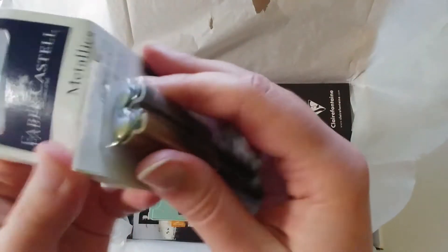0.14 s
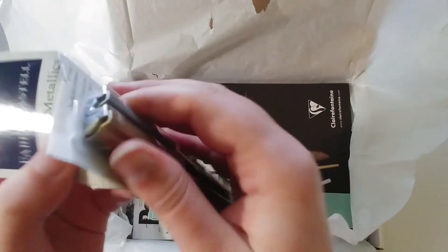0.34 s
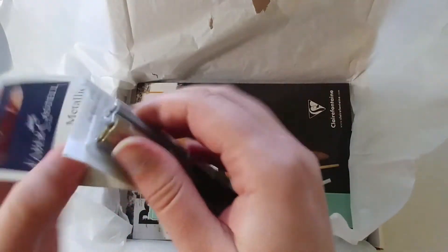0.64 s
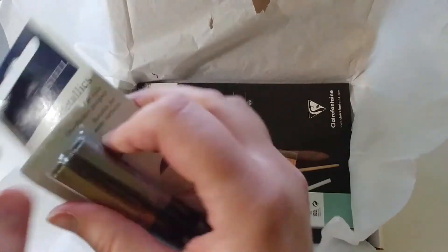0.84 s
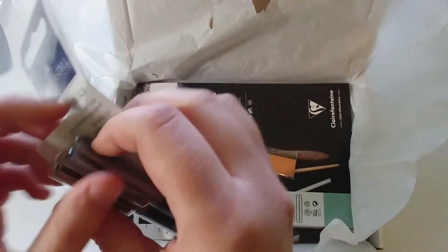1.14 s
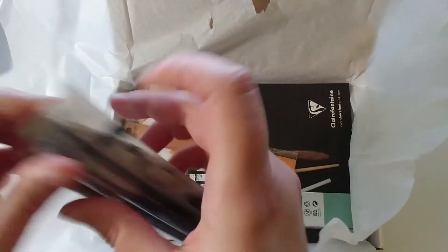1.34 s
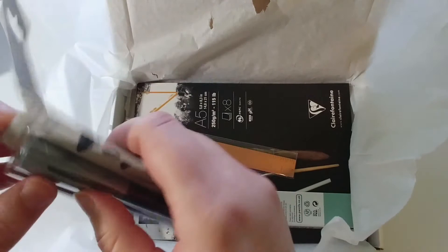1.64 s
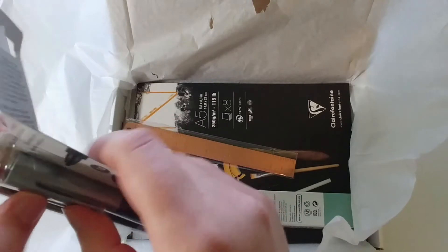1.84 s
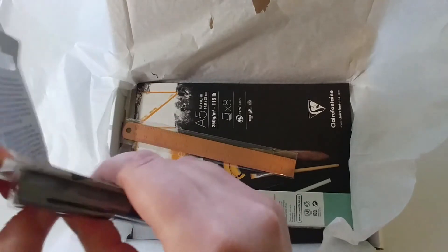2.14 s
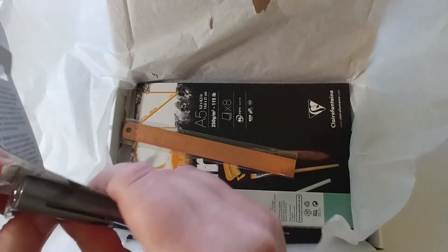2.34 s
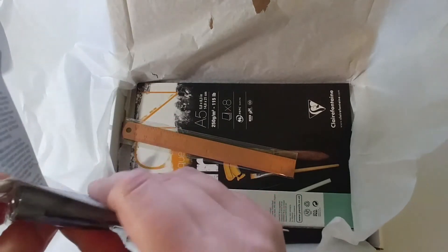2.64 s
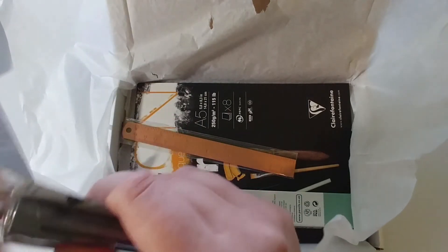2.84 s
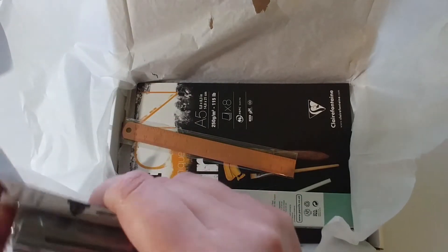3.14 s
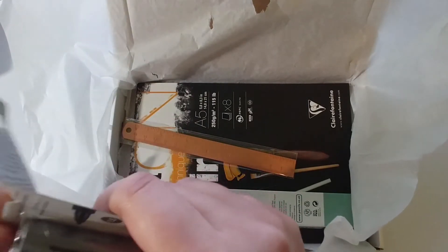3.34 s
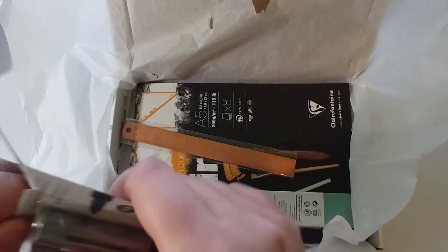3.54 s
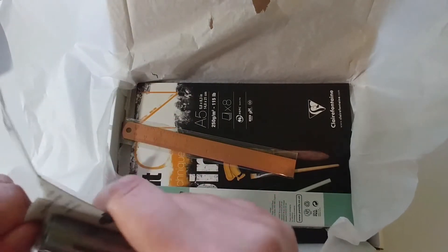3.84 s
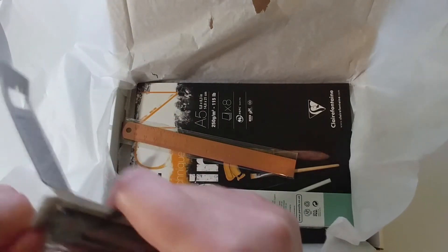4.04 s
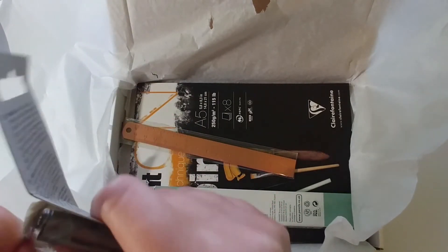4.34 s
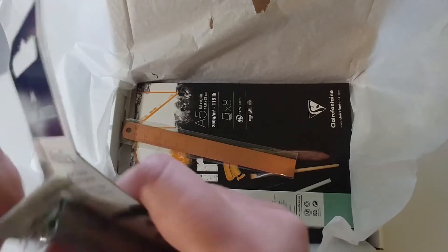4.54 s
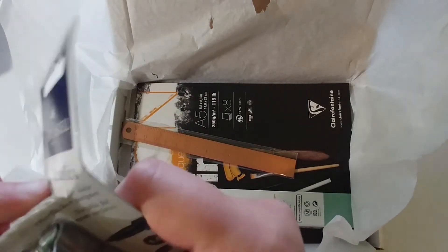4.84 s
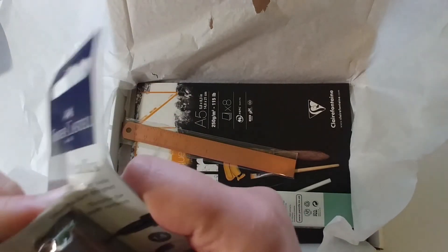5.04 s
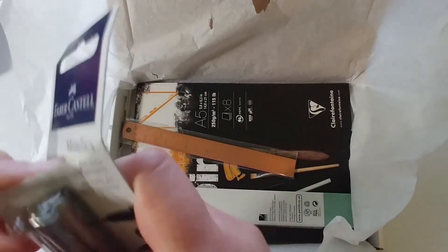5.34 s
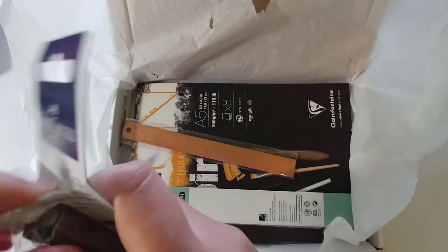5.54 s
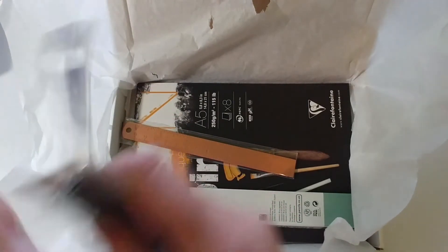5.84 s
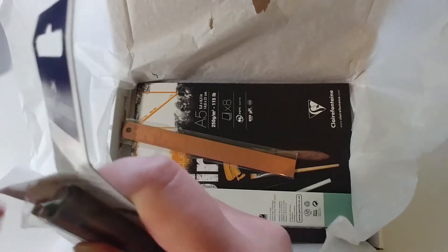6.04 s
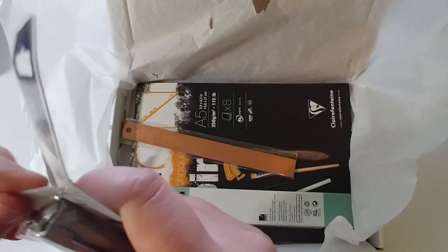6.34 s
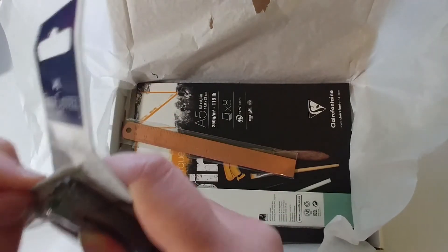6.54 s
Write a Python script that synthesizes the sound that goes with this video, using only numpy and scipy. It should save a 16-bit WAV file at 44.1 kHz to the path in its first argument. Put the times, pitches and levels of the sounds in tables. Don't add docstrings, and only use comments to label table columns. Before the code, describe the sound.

Very close to a small stereo microphone, hands bend a stiff plastic blister pack. Film rustles and crackles, then hard bright snaps burst irregularly, with a soft card crease and a dull table knock before one second. Snaps cluster from two seconds and return in loud groups around four, five and nearly six seconds. A small room answers briefly; faint hum lies beneath.

```python
import sys
import numpy as np
from scipy import signal
from scipy.fft import rfft, irfft
from scipy.io import wavfile
from scipy.ndimage import uniform_filter1d, minimum_filter1d

SR = 44100
rng = np.random.default_rng(int(sys.argv[2]) if len(sys.argv) > 2 else 0)


def pcm_store(signal):
    levels = np.round(np.clip(np.atleast_2d(signal), -1, 1) * 32767)
    wavfile.write(sys.argv[1], SR, levels.astype(np.int16).T)


def voltage_ratio(level):
    return 10 ** (np.asarray(level, float) / 20)


N = 294493


def evened(x):
    return x / np.sqrt(np.mean(x ** 2) + 1e-20)


def read(points, hz):
    f, value = np.transpose(points)
    return np.interp(np.log(hz + 1), np.log(f + 1), value)


def causal(points, size=2048):
    log_gain = np.log(voltage_ratio(read(points, abs(np.fft.fftfreq(size, 1 / SR)))))
    return np.fft.ifft(np.exp(np.conj(signal.hilbert(log_gain)))).real[:size // 2]


def add(mix, s, sound):
    part = mix[:, round(s * SR):][:, :sound.shape[1]]
    part += sound[:, :part.shape[1]]


def ports(left, right, pan_db):
    lag = 13
    return np.array([left * voltage_ratio(pan_db / 2), np.roll(right * voltage_ratio(-pan_db / 2), lag)])


# (frequency [Hz], level [dB per Hz])
HUM_COLOUR = [(25, -37.5), (45, 2), (68, 15.5), (95, -1.5), (180, -5), (540, -4), (1200, -10.5),
              (3000, -10), (6800, -17), (7800, -5.5), (10400, -36), (12000, -19), (15300, -17),
              (16300, -45.5)]
# (time [s], level [dB])
MOTOR_LEVEL = [
    (0, -82),
    (1.7, -80),
    (1.9, -70),
    (2.2, -80),
    (4.5, -80),
    (4.75, -68),
    (5.8, -69),
    (6.0, -82),
    (6.68, -82),
]


def air():
    noise = rng.standard_normal((2, N)) + .5 * rng.standard_normal(N)
    shaped = irfft(rfft(noise) * voltage_ratio(read(HUM_COLOUR, np.fft.rfftfreq(N, 1 / SR))), N)
    drone = evened(signal.lfilter(*signal.iirpeak(133, 14.0, SR), noise))
    drone_db = np.interp(np.arange(N) / SR, *np.transpose(MOTOR_LEVEL))
    both = voltage_ratio(-62.5) * evened(shaped) + voltage_ratio(drone_db + 2.5) * drone
    return both * voltage_ratio(np.array([[1.5], [-1.5]]))


# (time of peak [s], level [dB])
STROKES = [(0.0, -40), (0.2, -34.5), (0.42, -42), (0.76, -29.5), (1.07, -54), (1.14, -49.5), (1.25, -39.5),
           (1.43, -36.5), (2.43, -39.5), (2.56, -34), (2.92, -37), (3.42, -30), (3.66, -37.5), (4.2, -29.5),
           (4.63, -32.5), (5.06, -36.5), (5.58, -45), (5.95, -22.5)]


def effort():
    swell_db_per_s, fade_db_per_s = 221, 257
    peak_s, peak_db = np.transpose(STROKES)
    late = np.arange(0, N + 64, 64)[:, None] / SR - peak_s
    db = peak_db - np.where(late < 0, -swell_db_per_s, fade_db_per_s) * late
    return np.repeat(db.max(axis=1), 64)[:N]


def crackle(size, per_s=5000, spread_db=3.0):
    ticks = voltage_ratio(spread_db * np.minimum(rng.exponential(1, size), 4)) * (rng.random(size) < per_s / SR)
    return ticks * (0.46 * rng.standard_normal(size) + rng.standard_normal((2, size)))


# (frequency [Hz], level [dB])
FILM_COLOUR = [(150, -41.5), (500, -11), (1200, -9.5), (2500, -1.5), (4500, 1), (7000, -2.5), (12000, -18),
               (17000, -9.5)]


def rustle():
    colour = causal(FILM_COLOUR)[None]
    left, right = evened(signal.oaconvolve(crackle(N), colour, axes=1)[:, :N])
    return voltage_ratio(effort() - 17.0) * np.vstack([ports(left, right, 23.4), left])


# (frequency [Hz], time to fall by 60 dB [s])
ROOM_RING = [(250, 0.24), (700, 0.16), (1800, 0.19), (4500, 0.17), (8000, 0.15), (12000, 0.14)]
# (time [s], level [dB])
ECHOES = [(.0025, -26.5), (.0045, -13), (.012, -15.5), (.018, -34)]


def room(x, push):
    out, turn = np.zeros((2, N)), np.arange(N) / SR * 9
    for k in range(3):
        taps = np.zeros((2, SR // 2))
        at = np.arange(40, SR // 2 - 10, 10) + rng.integers(0, 10, (2, (SR // 2 - 41) // 10))
        np.put_along_axis(taps, at, rng.choice([-1., 1.], at.shape), 1)
        hz, t, z = signal.stft(taps, SR, nperseg=128)
        tail = signal.istft(z * voltage_ratio(-60 * t / read(ROOM_RING, hz)[:, None]), SR, nperseg=128)[1]
        tail *= 1 - np.exp(-(np.arange(tail.shape[1]) / SR / .014) ** 2)
        share = np.sqrt(2 / 3) * np.cos(turn + k * np.pi / 3)
        out += signal.fftconvolve(push[None] * share, tail / np.linalg.norm(tail[0]), axes=1)[:, :N]
    out = signal.lfilter(*signal.butter(1, 350, "high", fs=SR), out)
    early = np.zeros((2, N))
    for k, (s, db) in enumerate(ECHOES):
        sides = x[::(-1) ** k]
        early += voltage_ratio(db) * np.roll(sides, round(s * SR), 1)
    return voltage_ratio(-8.5) * out + early


def body(push, hz, card_db, edge_db, ring_db=-42.0, broad_db=-2.0):
    panel = signal.lfilter(*signal.iirpeak(hz, 2.6, SR), push)
    ring = signal.lfilter(*signal.iirpeak(hz, 9.0, SR), push)
    broad = signal.lfilter(*signal.butter(2, [0.2 * hz, min(3.5 * hz, 9000)], "band", fs=SR), push)
    card = signal.lfilter(*signal.butter(1, [60, 900], "band", fs=SR), push)
    edge = signal.lfilter(*signal.butter(2, 6000, "high", fs=SR), push)
    parts = zip([panel, ring, broad, card, edge], [0, ring_db, broad_db, card_db, edge_db])
    return evened(sum(voltage_ratio(db) * evened(part) for part, db in parts))


# (time [s], left over right [dB])
HANDS = [
    (0, 2),
    (0.6, 7),
    (1.9, 5.5),
    (2.4, 2.5),
    (4.0, 3),
    (5.2, 1),
    (6.68, 12),
]


def balance(s, db):
    return np.interp(s, *np.transpose(HANDS)) - 0.4 * db


def flurry(length, db, hz, card_db, pan_db):
    ticks = crackle(SR // 4)[:, :round(length * SR)]
    swelling = ticks * signal.windows.tukey(ticks.shape[1], .7)
    edge_db = 13.0 * np.log2(hz / 5000)
    left, right = body(swelling, hz, card_db, edge_db)
    return voltage_ratio(db) * np.vstack([ports(left, right, pan_db), left])


def add_flurries(pack, rows, card_db):
    for s, length, db, hz in rows:
        add(pack, s, flurry(length, db, hz, card_db, balance(s, db + 27)))


# (time [s], length [s], level [dB], centre [Hz])
BENDS = [(.01, 0.052, -40.5, 3030), (0.643, 0.092, -43.5, 2450), (0.768, 0.012, -16, 900),
         (0.849, 0.072, -54, 2910), (1.172, 0.041, -39, 3150), (1.248, 0.33, -49.5, 1800),
         (1.3, 0.082, -61, 950), (1.592, 0.026, -46, 1190), (4.69, 0.031, -47, 700),
         (5.035, 0.031, -39, 3010), (5.201, 0.021, -51, 604), (0.6, 0.24, -58.5, 524)]


def bends(pack):
    add_flurries(pack, BENDS, card_db=8)


def snap(db, hz, card_db=-28.5, edge_db=-0.5, pan_db=0.0, broad_db=-2.0):
    t = np.arange(600) / SR
    same = 0.39
    jerks = rng.standard_normal((3, len(t))) * voltage_ratio(0.55 * rng.standard_normal(len(t)))
    jerks[1] = same * jerks[0] + np.sqrt(1 - same ** 2) * jerks[1]
    jerks *= voltage_ratio(-60 * t / .010) * (1 - np.exp(-t / .0004))
    jerks[2] = (t == 0) + .12 * jerks[2]
    left, right, push = (body(jerk, hz, card_db + 19.5, edge_db + 0.5, ring_db, broad_db)
                         for jerk, ring_db in zip(jerks, [-3.0, -3.0, -15.0]))
    return voltage_ratio(db - 18) * np.vstack([ports(left, right, np.clip(pan_db, -4, 14)), push])


def add_snaps(pack, rows, thump_db, broad_db):
    for s, db, hz, edge_db in rows:
        add(pack, s, snap(db, hz, thump_db - 0.1 * db, edge_db, balance(s, db), broad_db))


# (time [s], level [dB], ring [Hz], edge spray [dB])
WALLS = [(0.028, -23.5, 2690, -38), (1.531, -15, 2480, -3), (1.862, -27, 2560, -24),
         (2.18, -8.5, 3090, -25), (2.992, -27.5, 3130, 11), (3.366, -3, 3040, -5.5), (3.449, -7, 2860, 2),
         (3.609, -6, 2910, -6), (3.815, -39, 3060, -10), (4.055, 9, 3130, -3), (4.163, -1.5, 3250, -3),
         (4.575, -25, 2730, -15.5), (4.827, -29, 2660, -1), (5.053, 2, 2990, -2), (5.3, -4, 2370, 4.5),
         (6.015, -3, 2830, -1.5), (6.026, -7.5, 2580, -3), (6.545, -13, 2850, -36)]


def walls(pack):
    add_snaps(pack, WALLS, thump_db=-30.5, broad_db=1)


# (frequency [Hz], level [dB], time to fall by 60 dB [s])
TABLE_NOTES = [(73.4, -0.5, 0.082), (172, 1.5, 0.046), (304, -10, 0.017), (760, -7.5, 0.076)]


def knock(db):
    t = np.arange(6000) / SR
    boom = sum(voltage_ratio(level_db - 60 * t / t60) * np.sin(2 * np.pi * hz * t) for hz, level_db, t60 in TABLE_NOTES)
    return ports(boom, boom, 39.0) * voltage_ratio(db - 2.5) * (1 - np.exp(-t / 0.0024))


# (time [s], level [dB])
KNOCKS = [(0.037, -55), (0.738, -43), (0.777, -28), (1.432, -50), (5.059, -42), (0.181, -48.5),
          (2.189, -46.5), (3.368, -65), (4.02, -42.5), (5.29, -45), (5.869, -47)]


def knocks():
    table = np.zeros((2, N))
    for s, db in KNOCKS:
        add(table, s, knock(db))
    return table


# (time [s], length [s], level [dB], centre [Hz])
FLURRIES = [(0.051, 0.056, -44.5, 3330), (0.165, 0.047, -28, 3700), (0.357, 0.046, -38, 6550),
            (0.577, 0.078, -36, 4100), (1.046, 0.11, -65, 6660), (1.84, 0.073, -47, 2190),
            (2.165, 0.053, -43.5, 2750), (2.967, 0.072, -44.5, 4450), (3.118, 0.018, -44, 5000),
            (3.135, 0.026, -23, 7000), (3.572, 0.045, -31.5, 3530), (4.008, 0.052, -8.5, 4400),
            (4.367, 0.051, -43, 4200), (4.495, 0.03, -46.5, 3500), (4.554, 0.044, -22.5, 3170),
            (5.061, 0.051, -22, 4720), (5.393, 0.046, -41.5, 3660), (5.539, 0.065, -87, 4450),
            (5.738, 0.029, -38.5, 4000), (5.841, 0.033, -42, 5900), (5.857, 0.07, -17.5, 6560),
            (6.148, 0.023, -64, 6000), (0.265, 0.024, -39.5, 4700), (6.215, 0.033, -76.5, 4500),
            (6.343, 0.032, -54, 5560), (6.465, 0.045, -72.5, 2600)]


def flurries(pack):
    add_flurries(pack, FLURRIES, card_db=-21)


# (time [s], level [dB], ring [Hz])
TICKS = [(0.135, -48, 2770), (0.5132, -82, 5470), (0.8665, -29, 3700), (0.9744, -44.5, 2530),
         (1.0327, -65, 1260), (1.0557, -56, 3030), (1.254, -22.5, 900), (1.4125, -52, 3860),
         (1.698, -33, 6000), (1.8033, -60.5, 1840), (1.984, -16, 3200), (2.6431, -35, 935),
         (2.739, -34.5, 3140), (3.3088, -34.5, 2960), (3.7848, -39, 724), (4.468, -43, 4000),
         (5.547, -42, 5370), (5.6642, -37.5, 1013), (6.1478, -39, 2860), (6.4662, -39, 955),
         (3.618, -18.5, 2870)]


def ticks(pack):
    for s, db, hz in TICKS:
        add(pack, s, snap(db, hz))


# (time [s], level [dB], ring [Hz], edge spray [dB])
CORNERS = [(0.169, 6.5, 4100, 4), (0.61, -15, 4000, -13), (1.725, -30, 3080, 2), (2.13, -13, 4600, 6),
           (2.2, -5, 3300, 2.5), (2.296, -2, 4470, 11.5), (3.129, -6, 4240, -27), (4.394, -19.5, 4030, -5),
           (4.492, -26, 3730, 2.5), (4.543, -11, 3940, 6), (4.549, -0.5, 3720, 1), (4.903, 8, 4600, 5),
           (5.264, -25.5, 4100, -9), (5.284, 3.5, 4240, -15.5), (5.873, 2.5, 4270, -21),
           (6.612, -2, 4400, -26)]


def corners(pack):
    add_snaps(pack, CORNERS, thump_db=-33, broad_db=5)


# (time [s], level [dB], ring [Hz], edge spray [dB])
RIMS = [(0.292, -24.5, 4530, -16), (0.47, -33.5, 5000, 3), (0.767, -9.5, 5550, 0.5), (1.439, -12, 5190, 7),
        (2.319, -5, 5790, -26.5), (2.413, -3.5, 5700, -17), (2.509, -4.5, 6500, -2), (2.819, -12, 5500, 10),
        (2.857, -2.5, 5180, 0.5), (3.153, -10, 5100, -33), (3.516, -1, 5080, -2), (3.571, -7.5, 5300, -3),
        (4.014, 3.5, 5300, -1.5), (4.032, -6, 5590, -25), (4.367, -23, 5560, 19), (5.086, -5, 6000, -19),
        (5.165, -15.5, 4660, -5.5), (5.56, -37, 5240, -16.5), (5.747, -30, 6070, -9.5),
        (5.758, -20.5, 4800, -3.5), (5.833, -40, 5400, 8), (5.856, 4, 4840, -17.5),
        (5.889, -11.5, 5640, -7), (5.914, -5.5, 4660, -11)]


def rims(pack):
    add_snaps(pack, RIMS, thump_db=-31, broad_db=-4)


# (time [s], level [dB], ring [Hz], edge spray [dB])
CARD = [
    (0.69, -26, 660, -16),
    (0.697, -28, 650, -19),
    (0.74, -21.5, 680, 5),
    (0.776, -13.5, 690, -16.5),
    (1.267, -21.5, 925, -27),
    (1.317, -27.5, 1040, -16),
    (1.331, -46, 1040, -5),
    (1.358, -25, 942, -21),
    (2.512, -2.5, 884, -36),
    (4.697, -24, 736, -32),
]


def card(pack):
    add_snaps(pack, CARD, thump_db=-26.5, broad_db=-7)


# (time [s], level [dB], ring [Hz], edge spray [dB])
DOME = [(0.895, -31, 2130, -28), (0.909, -43, 1910, -7), (1.193, -10, 1800, -42), (1.602, -7.5, 1890, -6),
        (1.856, -26.5, 1820, -12), (1.939, -39, 1500, -41), (1.982, -6, 1874, -1),
        (2.185, -1.5, 2060, -10.5), (2.461, -5.5, 2120, -19.5), (3.584, -2, 2020, -27),
        (3.839, -8, 2020, -12), (4.283, -6.5, 2054, -8.5), (5.413, -19.5, 1810, -34),
        (5.894, -1, 1290, -13)]


def dome(pack):
    add_snaps(pack, DOME, thump_db=-35.5, broad_db=-6)


def scene():
    pack = rustle()
    for source in [flurries, bends, rims, corners, walls, dome, card, ticks]:
        source(pack)
    return pack[:2] + room(pack[:2], pack[2]) + knocks()


# (frequency [Hz], level [dB])
MICROPHONE_COLOUR = [(40, -4), (100, -1.5), (6500, 2.5), (7200, 3), (7900, 13.5), (8800, 4.5),
                     (10400, -8.5), (11800, -3), (15600, -2), (16400, -29.5), (17500, -72.5)]


def microphone(dry):
    return signal.oaconvolve(dry, causal(MICROPHONE_COLOUR)[None], axes=1)[:, :N]


def limiter(heard):
    over_db = np.maximum(20 * np.log10(abs(heard) + 1e-9) + .2, 0)
    over_db = -minimum_filter1d(-over_db, size=65, axis=1)
    fall = np.arange(N) * 430.0 / SR
    held_db = np.maximum.accumulate(over_db + fall, axis=1) - fall
    limited = heard / voltage_ratio(uniform_filter1d(held_db, size=33, axis=1))
    return np.clip(limited, -1, 1)


def starve(x, below_db=30.5, from_hz=9300):
    hz, t, z = signal.stft(x, SR, nperseg=1024)
    band = np.arange(len(hz)) // 16
    power = np.add.reduceat(abs(z) ** 2, np.arange(0, len(hz), 16), axis=1)
    chance = voltage_ratio(rng.standard_normal(power.shape[1:]))
    weak = power < power.max(1, keepdims=True) * voltage_ratio(-2 * below_db) * chance
    emptied = weak[:, band] & (hz > from_hz)[:, None]
    return signal.istft(z * ~emptied, SR, nperseg=1024)[1][:, :N]


def band_limit(x):
    return signal.sosfilt(signal.butter(12, 17000, fs=SR, output="sos"), x)


def record(dry):
    heard = microphone(dry) + air()
    mix = starve(limiter(heard))
    return band_limit(mix)


dry = scene()
out = record(dry)
pcm_store(out)
```